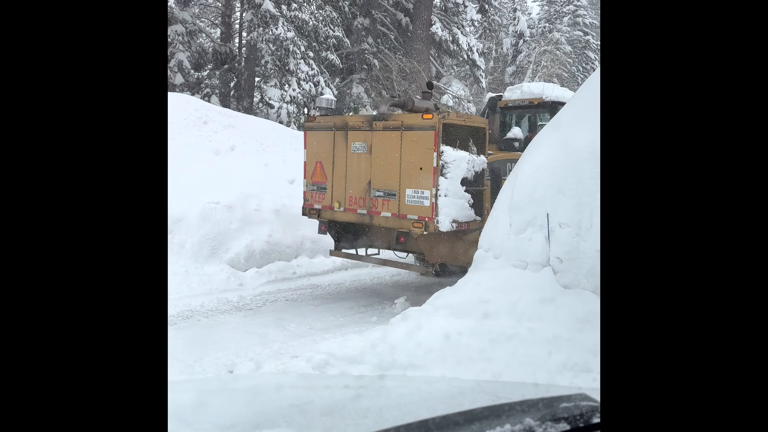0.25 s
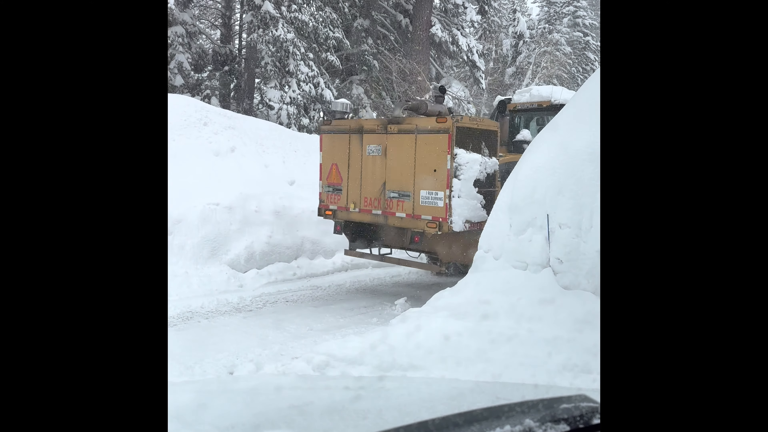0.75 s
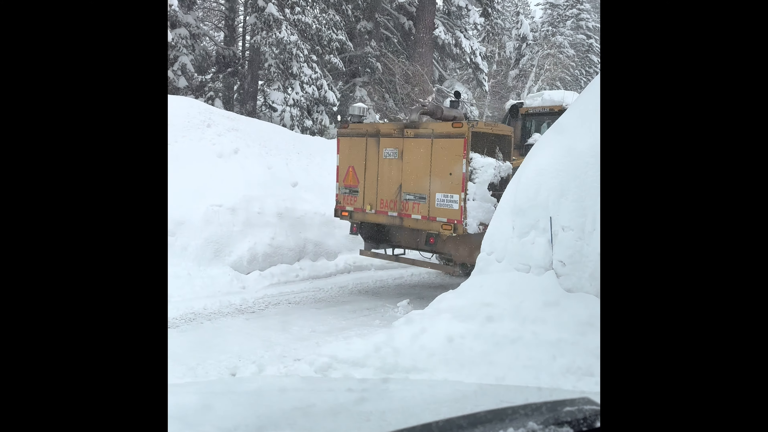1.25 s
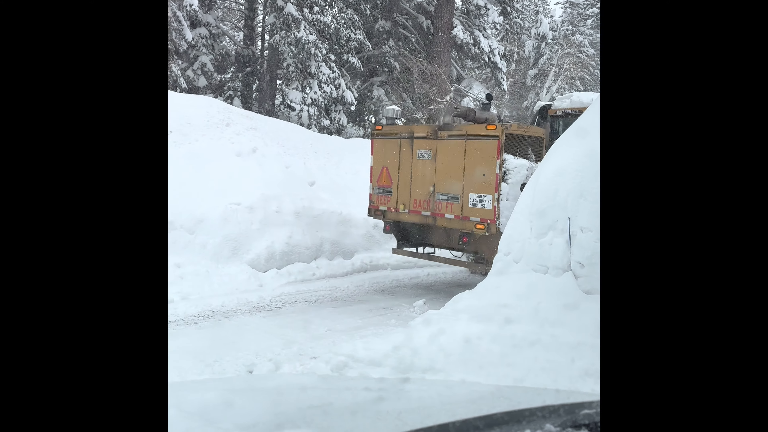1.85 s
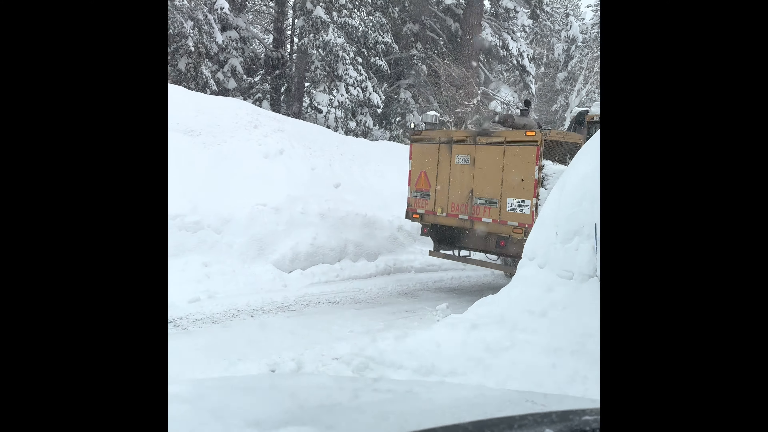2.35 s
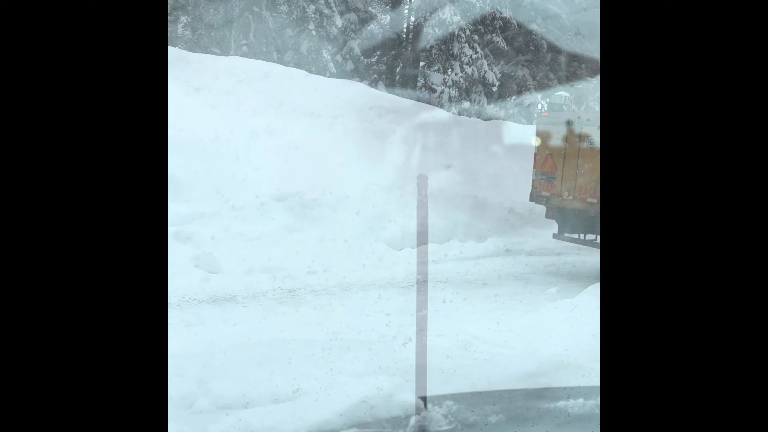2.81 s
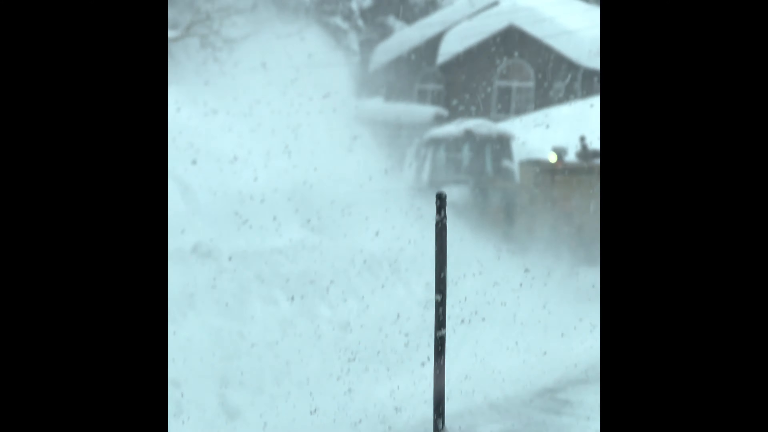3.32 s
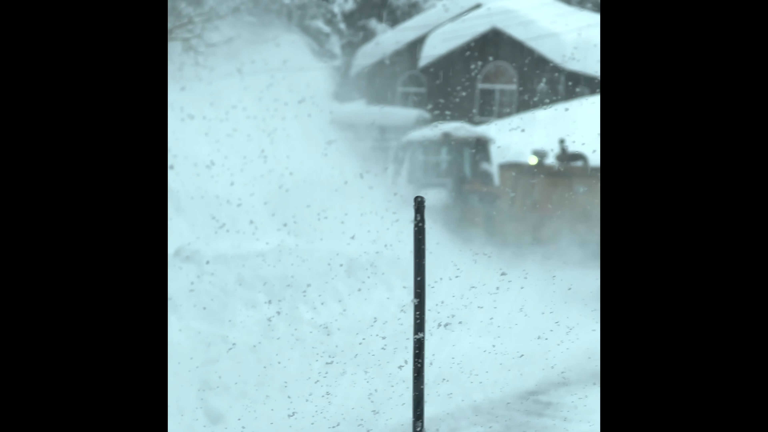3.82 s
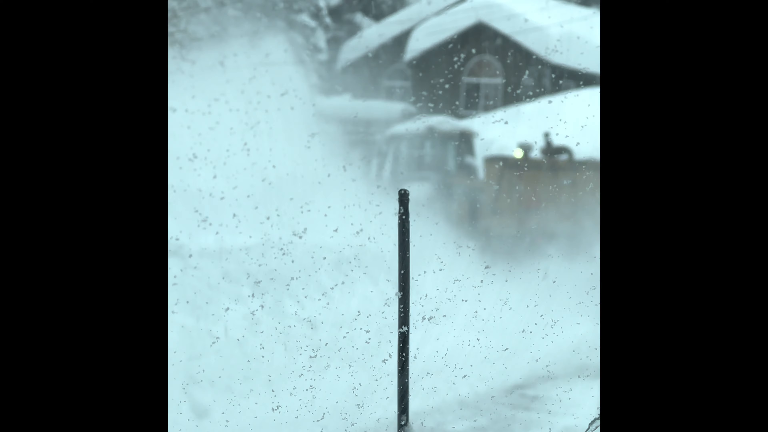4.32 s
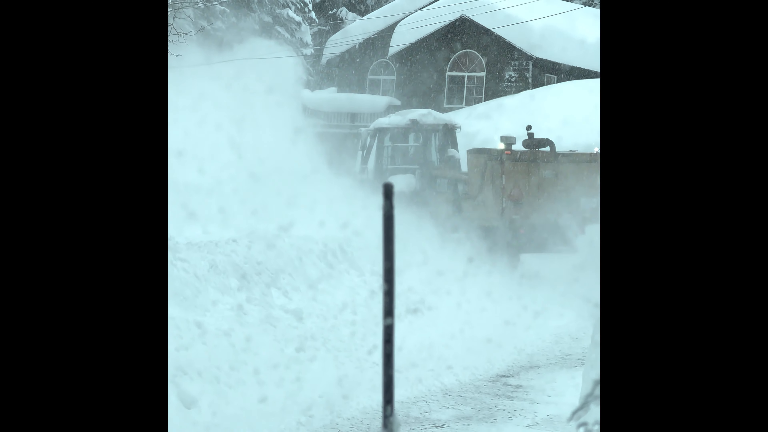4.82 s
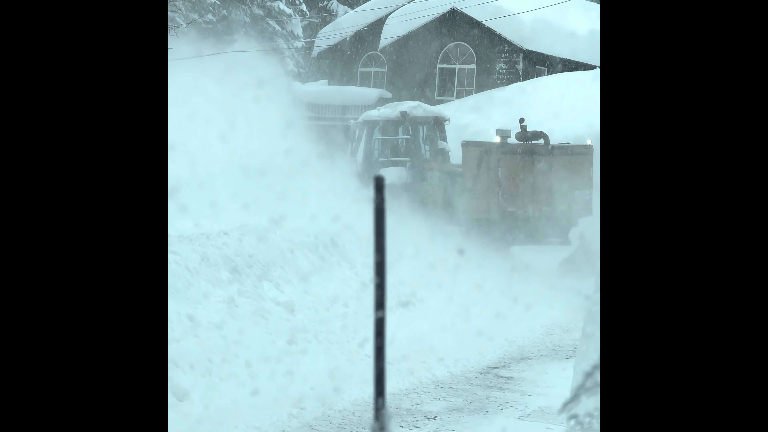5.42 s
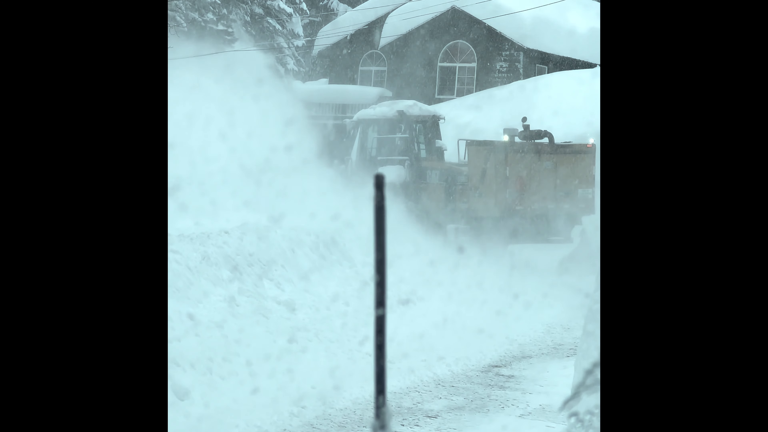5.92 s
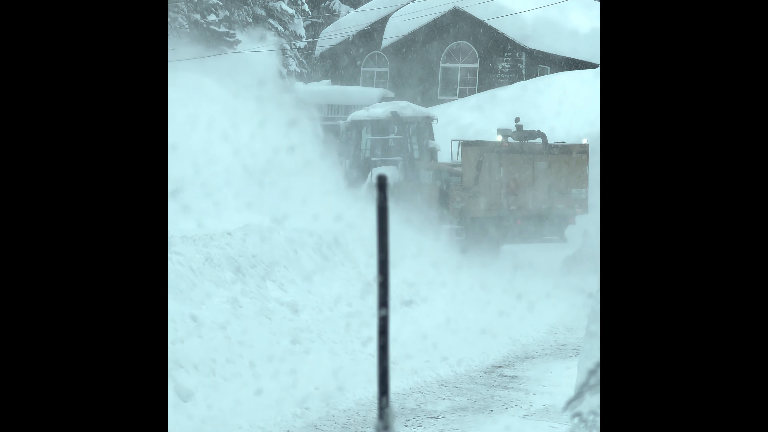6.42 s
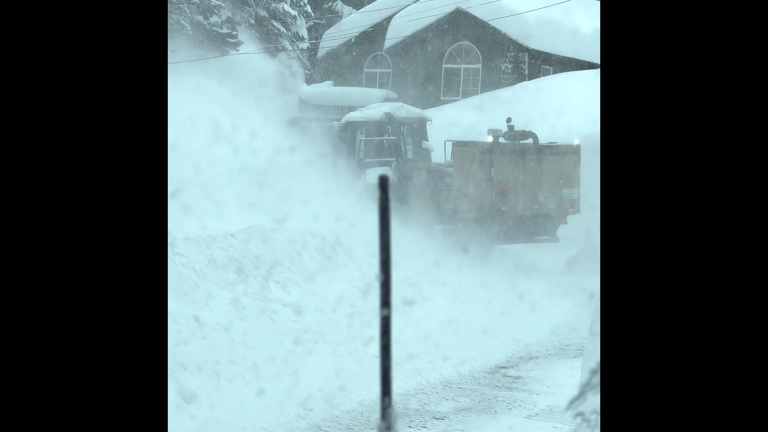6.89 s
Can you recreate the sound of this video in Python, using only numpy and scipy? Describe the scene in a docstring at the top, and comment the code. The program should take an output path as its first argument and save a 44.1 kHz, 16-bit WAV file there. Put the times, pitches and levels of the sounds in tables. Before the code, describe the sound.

A diesel loader with a snow blower works close by, heard from inside an idling car. Its strong low drone and fan roar slowly sink, with faint wavering whines on top. Before halfway, a brief soft hiss leads into a quieter stretch: the machine is far off, the car's slower idle throbs through the cabin over a heater fan, and a loose part ticks faintly and unevenly.

```python
"""Snow blower from a parked car

A diesel loader with a snow blower works close by, heard from inside a car whose V8 idles. Firing
pulses make both engines drone; the loader's fans and blower roar, and its pump, gears and turbo sing.
Near 2.7 s the scene dissolves, through a brief hiss, into a later one: the loader is far off,
the car idles slower, its cabin throbs and a loose part ticks."""
import sys
import numpy as np
from scipy import signal
from scipy.fft import rfft, irfft, next_fast_len
from scipy.io import wavfile

SR = 44100
rng = np.random.default_rng(int(sys.argv[2]) if len(sys.argv) > 2 else 0)


def dump(signal):
    """Clip the signal to [-1, 1] and save it as 16-bit WAV at the path in sys.argv[1]."""
    limited = np.clip(np.atleast_2d(signal).T, -1, 1)
    pcm = np.round(limited * 32767).astype(np.int16)
    wavfile.write(sys.argv[1], SR, pcm)


N = 315303
TIME_S = np.arange(N) / SR
FFT_SIZE = next_fast_len(N)
BIN_HZ = np.maximum(np.arange(FFT_SIZE // 2 + 1) * SR / FFT_SIZE, 1)


def from_db(db):
    """Decibels to gain."""
    return 10 ** (np.asarray(db) / 20)


def automation(rows):
    """One curve per column after time_s, sample by sample."""
    time_s, *columns = np.transpose(rows)
    return [np.interp(TIME_S, time_s, column) for column in columns]


def over_frequency(rows):
    """A curve across the spectrum, straight between points in log frequency."""
    freq_hz, values = np.transpose(rows)
    return np.interp(np.log(BIN_HZ), np.log(freq_hz), values)


def drift(rate_hz):
    """A slow random wobble with a spread of 1."""
    pole = np.exp(-200 * np.pi * rate_hz / SR)  # one step per 100 samples
    steps = rng.standard_normal(N // 100 + 1002)
    slow = signal.lfilter([1], [1, -2 * pole, pole * pole], steps)[1000:]
    return np.interp(np.arange(N) / 100, np.arange(len(slow)), slow / slow.std())


# Stereo balance: freq_hz, left_over_right_db
STEREO_LEAN = [(150, 0), (240, 1), (370, 2.5), (590, 5), (930, 4.5), (1470, 1.8), (2330, .5), (3680, 0)]
# Stereo phase offset: freq_hz, left_lead_rad
STEREO_LEAD = [(50, 0), (110, .07), (260, .25), (690, .9), (1000, .3), (1500, .4), (1900, 0), (2700, -.2),
               (4000, 0)]


def to_stereo(left, right):
    """Offset two spectra in level and phase, so the mids lean left."""
    half = from_db(over_frequency(STEREO_LEAN) / 2) * np.exp(.5j * over_frequency(STEREO_LEAD))
    return np.array([left * half, right / half])


def air_noise(spectrum, resonances, likeness, flutter_db, treble_db=0, bands=10):
    """Coloured stereo noise of rms 1; its bands flutter partly together, partly alone."""
    peaks_db = sum(db / (1 + (2 * (BIN_HZ - hz) / width) ** 2) for hz, width, db in resonances)
    colour = from_db(over_frequency(spectrum) + peaks_db)
    shared, left, right = rfft(rng.standard_normal((3, FFT_SIZE))) * colour
    alike = np.clip(over_frequency(likeness), 0, 1)
    stereo = to_stereo(*[np.sqrt(alike) * shared + np.sqrt(1 - alike) * own for own in (left, right)])
    band_position = np.clip(np.log2(BIN_HZ / 80) / 7, 0, 1) * (bands - 1)  # seven octaves from 80 Hz
    together, noise = drift(1.1), 0
    for k in range(bands):
        gain_db = flutter_db * (1.1 * together + drift(6.0)) + treble_db * (k > bands // 2)
        band = irfft(stereo * np.clip(1 - abs(band_position - k), 0, 1), FFT_SIZE)[:, :N]
        noise = noise + from_db(gain_db) * band
    return noise / noise.std()


# Tone of the heater fan and distant roar: freq_hz, relative_db
CABIN_SPECTRUM = [(18, -28), (28, -8), (48, -15), (71, -7.5), (132, -14.5), (226, -22.5), (457, -29),
                  (900, -35.5), (1010, -44.5), (1910, -46), (2500, -47.5), (3130, -60), (4130, -71.5),
                  (5000, -72.5), (8500, -72), (10300, -79.5)]
# Cabin resonances and dips: centre_hz, width_hz, gain_db
CABIN_RESONANCES = [(225, 17, 7.5), (531, 37, 4), (703, 59, 10.5), (864, 62, 3), (1110, 50, 6.5),
                    (1360, 28, 4.5), (1500, 62, -3.5), (1590, 65, 4), (1756, 35, -5.5), (1777, 15, 10),
                    (1860, 44, -5.5), (2050, 97, 2.5), (2220, 33, 10), (2410, 34, 0.5), (2524, 45, 8.5),
                    (2560, 32, -10.5), (2660, 43, -9.5), (2660, 20, 5), (3040, 120, -9)]
# How alike left and right are in the far scene: freq_hz, shared_fraction
FAR_LIKENESS = [(130, 1), (240, .98), (350, .9), (630, .65), (1140, .75), (1700, .85), (2100, 1), (8000, 1)]


def cabin_air():
    """The bed of the far scene: heater fan and distant loader, coloured by the cabin."""
    return from_db(-41.5) * air_noise(CABIN_SPECTRUM, CABIN_RESONANCES, FAR_LIKENESS, flutter_db=0.2)


def burst(start_s, level_db, centre_hz, width_hz, t60_s):
    """Bursts of band noise that build in a few milliseconds and die away."""
    hits = np.full(N, 1e-18)
    hits[(np.asarray(start_s) * SR).astype(int)] = from_db(level_db)
    attack = signal.lfilter([.012], [1, -.988], hits)
    envelope = signal.lfilter([1], [1, -from_db(-60 / (t60_s * SR))], attack)
    edges_hz = [centre_hz - width_hz / 2, centre_hz + width_hz / 2]
    bandpass = signal.butter(2, edges_hz, "band", fs=SR, output="sos")
    noise = signal.sosfilt(bandpass, rng.standard_normal(N))
    return envelope * noise / noise.std()


# Stray clicks: start_s, level_db, centre_hz, width_hz
LONE_CLICKS = [(.1247, -62.5, 8200, 2580), (2.9133, -55, 5140, 500), (2.9145, -57, 7300, 4400)]


def lone_clicks():
    """A small bright click at the start and a fused pair in the dissolve."""
    return sum(burst(*click, t60_s=0.14) for click in LONE_CLICKS)


# Ticks of the loose part, before each mode's trim: start_s, outer_modes_db, middle_mode_db
LOOSE_PART_TICKS = [(3.3447, -63, -74), (3.449, -61.5, -76), (3.5335, -61.5, -82), (3.7378, -64, -76),
                    (3.8461, -68, -83), (3.9399, -63.5, -81), (4.0192, -65, -82), (4.0925, -68, -79),
                    (4.1464, -60.5, -83), (4.2247, -65, -79), (4.3365, -65, -74), (4.422, -65, -77),
                    (4.4996, -68, -83), (4.5525, -65, -75), (4.6333, -61.5, -91), (4.7341, -64, -72),
                    (4.8214, -68, -79), (4.9416, -65, -72), (5.0563, -67, -81), (5.1411, -66, -73),
                    (5.223, -69, -83), (5.3517, -63, -72), (5.5343, -65, -77), (5.7413, -60, -79),
                    (5.8371, -70, -80), (5.9408, -63, -74), (6.0251, -65, -81), (6.1459, -60.5, -88),
                    (6.2701, -61.5, -90), (6.34, -60, -91), (6.4217, -71, -83), (6.543, -66, -73),
                    (6.743, -64, -77), (6.8193, -66, -81), (6.9445, -64.5, -85), (7.0219, -63, -78)]
# Its low, middle and high modes: centre_hz, width_hz, t60_s
LOOSE_PART_MODES = [(4050, 600, .14), (5650, 700, .12), (8300, 1400, .12)]


def loose_part():
    """Each tick buzzes briefly in three broad modes; low and high trade level at random."""
    start_s, outer_db, middle_db = np.transpose(LOOSE_PART_TICKS)
    trade_db = 3.5 * rng.standard_normal(len(start_s))
    levels_db = outer_db - 11.5 + trade_db, middle_db + 0.5, outer_db - 13 - trade_db
    return sum(burst(start_s, db, *mode) for db, mode in zip(levels_db, LOOSE_PART_MODES))


# Tone of the hiss: freq_hz, relative_db
HISS_SPECTRUM = [(2000, -34), (3500, -2), (5000, -4.5), (7000, -3.5), (9500, -5.5), (10300, -12.5)]
# How alike left and right are in the hiss and the close roar: freq_hz, shared_fraction
NEAR_LIKENESS = [(30, 1), (110, .995), (240, .95), (350, .9), (630, 0.86), (1140, .75), (2040, .5),
                 (3680, 0.23), (8000, 0.33)]


def hiss():
    """A bright hiss over the dissolve: it swells, puffs once on the way up, then sags."""
    start_s, full_s, end_s, fade_s = 2.14, 2.66, 3.42, 0.2
    swell = np.clip((TIME_S - start_s) / (full_s - start_s), 0, 1)
    sag_db = 26 * np.maximum(TIME_S - full_s, 0)
    puff_db = 4 * np.exp(-((TIME_S - 2.39) / .04) ** 2)
    level_db = -55 - 15.5 * (1 - swell) - sag_db + puff_db
    fades = np.clip(10 * swell, 0, 1) * np.clip((end_s - TIME_S) / fade_s, 0, 1)
    return fades * from_db(level_db) * air_noise(HISS_SPECTRUM, [], NEAR_LIKENESS, flutter_db=.3, bands=4)


def engine(rpm_curve, orders, levels_db, phase_of, start_cycles, waver_db):
    """Harmonics of the four-stroke cycle (rpm / 120); uneven burning makes each one waver."""
    rpm, = automation(rpm_curve)
    cycles = start_cycles + np.cumsum(rpm) / (120 * SR)
    drone = 0
    for order, db in zip(orders, levels_db):
        amplitude = np.sqrt(2) * from_db(db + waver_db * drift(4))
        drone = drone + amplitude * np.cos(2 * np.pi * order * cycles + phase_of(order))
    return drone


# Which bank of the V fires, in turn: bank_sign
FIRING_BANKS = [1, -1, 1, 1, -1, 1, -1, -1]


def v_eight_phase(order):
    """Odd orders follow the uneven turns of the two banks; the rest follow the even firing shake."""
    if order % 2:
        return np.angle(np.fft.fft(FIRING_BANKS)[order % 8])
    shake_offset_cycles = .047  # against the exhaust beat
    return 2 * np.pi * order * shake_offset_cycles - np.pi / 2


# The car's idle speed in the near and far scenes: time_s, speed_rpm
IDLE_RPM_NEAR = [(0, 693), (.45, 692), (1.05, 687), (1.35, 685), (1.65, 679), (2.25, 679), (2.7, 675)]
IDLE_RPM_FAR = [(3.0, 601), (3.4, 600.4), (4.2, 599), (5.0, 601.8), (5.8, 601), (6.2, 600), (6.8, 595)]
# Harmonics of its firing cycle: order
IDLE_ORDERS = [5, 7, 8, 9, 10, 11, 12, 13, 16, 18, 21, 23, 24]
# Their mix in each scene, one entry per order: level_db
IDLE_DB_NEAR = [-51, -56, -41, -42, -60, -35, -60, -44, -56, -52, -56, -60, -60]
IDLE_DB_FAR = [-70, -68, -43, -59, -62, -36, -54, -39.5, -50, -57, -58, -58, -48.5]


def car_idle(rpm_curve, levels_db, start_cycles, waver_db):
    """The V8's exhaust beat and firing shake throb through the cabin."""
    return engine(rpm_curve, IDLE_ORDERS, levels_db, v_eight_phase, start_cycles, waver_db)


def tone(pitch_hz, level_db, waver_db, rate_hz, pitch_spread):
    """A sine that wavers in pitch and level."""
    cycles = np.cumsum(pitch_hz * (1 + pitch_spread * drift(rate_hz))) / SR
    return np.sqrt(2) * from_db(level_db + waver_db * drift(rate_hz)) * np.sin(2 * np.pi * cycles)


# Partials of the loader's pump: pitch_hz, base_level_db
PUMP_PARTIALS = [(466, -65.5), (699, -55.5), (932, -64.5), (1163, -67.5), (1766, -72.5), (2316, -68),
                 (3680, -80), (4150, -80.5)]
# Fader ride on all of them: time_s, gain_db
PUMP_RIDE = [(0, 1.5), (.9, 0.5), (1.2, 0), (1.45, 6), (1.8, 2), (2.4, 1.5), (3, 2)]


def pump():
    """The pump sings a cluster of wavering tones that swells once."""
    ride_db, = automation(PUMP_RIDE)
    partials = sum(tone(hz, db, waver_db=3.5, rate_hz=8.9, pitch_spread=.0015) for hz, db in PUMP_PARTIALS)
    return from_db(ride_db) * partials


# Turbo whistle: time_s, pitch_hz, level_db
TURBO_CURVE = [(0, 7800, -88), (.5, 8030, -71), (.9, 8150, -80.5), (1.35, 8340, -79), (2.0, 8240, -81.5),
               (2.9, 8180, -85.5)]
# Gear whine: time_s, pitch_hz, level_db
GEAR_CURVE = [(0, 2965, -75.5), (1, 2950, -72), (2.5, 3016, -61.5), (2.9, 3040, -64)]
# Two faint, nearly steady tones on top: pitch_hz, level_db
FAINT_TONES = [(9490, -91), (9710, -93)]


def whistles():
    """The spinning turbo and meshing gears glide and flicker under two thin high tones."""
    turbo = tone(*automation(TURBO_CURVE), waver_db=3.5, rate_hz=23.0, pitch_spread=.0022)
    gears = tone(*automation(GEAR_CURVE), waver_db=4.5, rate_hz=20.0, pitch_spread=.005)
    faint = sum(tone(hz, db, waver_db=1.0, rate_hz=5.0, pitch_spread=.0003) for hz, db in FAINT_TONES)
    return turbo + gears + faint


# Tone of the fans and blower: freq_hz, relative_db
BLOWER_SPECTRUM = [(18, -45), (27, -18.5), (50, -14.5), (88, -15), (130, -19), (164, -17), (226, -19.5),
                   (305, -23.5), (500, -27.5), (900, -34), (1680, -41.5), (2750, -34.5), (4000, -48.5),
                   (4700, -58.5), (9300, -66.5), (10300, -76.5)]
# Cabin and bodywork resonances and dips: centre_hz, width_hz, gain_db
BODY_RESONANCES = [(418, 30, 3), (537, 24, 0), (740, 36, 1), (787, 29, 5.5), (1005, 32, -3.5),
                   (1320, 130, 2.5), (1398, 57, -10), (1454, 60, 7), (1545, 150, 2), (1710, 37, -7),
                   (2000, 58, 0), (2150, 40, 0.5), (2250, 67, 0.5), (2470, 83, -7.5), (2600, 50, -4.5),
                   (2870, 70, -3), (3700, 41, 6.5), (3850, 120, -4), (4090, 83, 5), (5160, 230, -1),
                   (5570, 250, 5.5)]


def blower_roar():
    """Fans and blower roar through the bodywork; the level falls while the treble's share grows."""
    level_db = -32 - 2.26 * TIME_S
    treble_db = -2.1 + 1.1 * TIME_S
    roar = air_noise(BLOWER_SPECTRUM, BODY_RESONANCES, NEAR_LIKENESS, flutter_db=0.74, treble_db=treble_db)
    return from_db(level_db) * roar


def straight_six_phase(order):
    """Even firing dips the pressure six times a cycle; cylinder differences fall at any phase."""
    return np.pi if order % 6 == 0 else rng.uniform(0, 2 * np.pi)


# The diesel's working speed: time_s, speed_rpm
DIESEL_RPM = [(0, 2206), (.45, 2205), (1.05, 2198), (1.65, 2207), (2.25, 2207), (2.9, 2201)]
# Harmonics of its firing cycle: order
DIESEL_ORDERS = [5, 6, 7, 8, 9, 10, 11, 12, 14, 15, 16, 18, 19, 22]
# Their mix, one entry per order: base_level_db
DIESEL_DB = [-54.5, -20.5, -45.5, -56.5, -52.5, -51.5, -49, -30.5, -45, -49.5, -57.5, -59.5, -51.5, -49.5]


def diesel_exhaust():
    """Six cylinders fire into a strong, slowly fading drone near 110 Hz."""
    drone = engine(DIESEL_RPM, DIESEL_ORDERS, DIESEL_DB, straight_six_phase,
                   start_cycles=-.075, waver_db=0.37)
    return from_db(0.98 - 1.1 * TIME_S) * drone


def loader():
    """The whole machine; exhaust and roar sink as it draws away behind a snow bank."""
    tones = rfft(diesel_exhaust() + pump() + whistles(), FFT_SIZE)
    return irfft(to_stereo(tones, tones), FFT_SIZE)[:, :N] + blower_roar()


def scene():
    """The scene with the loader near dissolves into the one with it far off."""
    start_s, end_s = 2.405, 3.267
    dissolve = np.clip((TIME_S - start_s) / (end_s - start_s), 0, 1)
    fade_in = dissolve ** 0.53  # the far scene comes up early
    near = loader() + car_idle(IDLE_RPM_NEAR, IDLE_DB_NEAR, start_cycles=-.06, waver_db=1.8)
    far = car_idle(IDLE_RPM_FAR, IDLE_DB_FAR, start_cycles=.92, waver_db=.9) + cabin_air()
    return (1 - dissolve) * near + fade_in * far + lone_clicks() + hiss() + loose_part()


def record(dry):
    """A steep low-pass cuts the top above 10.3 kHz."""
    return signal.sosfilt(signal.ellip(10, .5, 60, 10300, fs=SR, output="sos"), dry)


dry = scene()
out = record(dry)
dump(out)
```